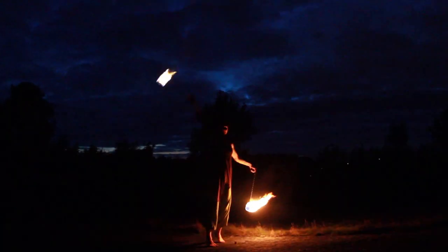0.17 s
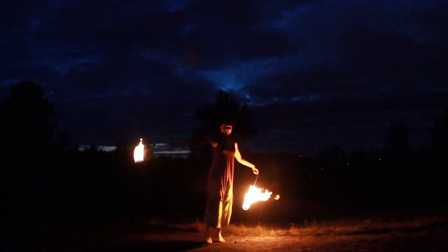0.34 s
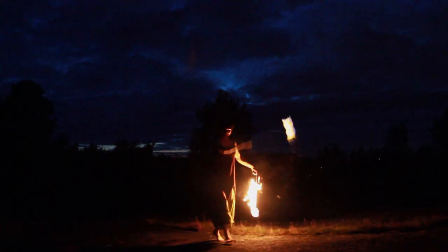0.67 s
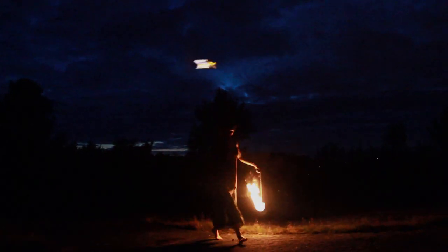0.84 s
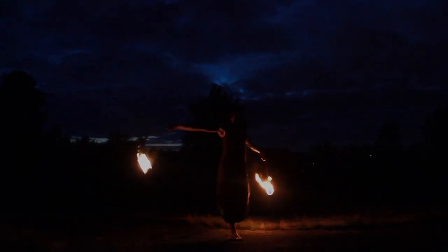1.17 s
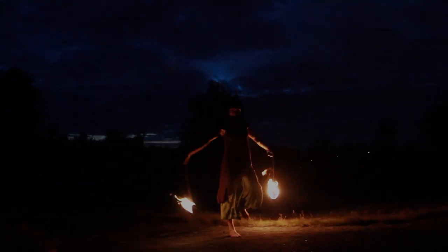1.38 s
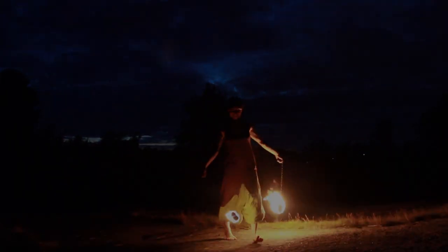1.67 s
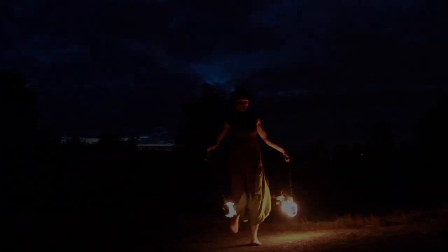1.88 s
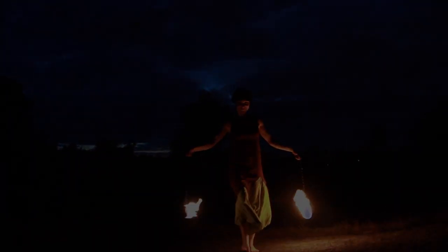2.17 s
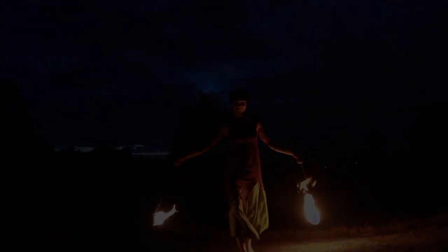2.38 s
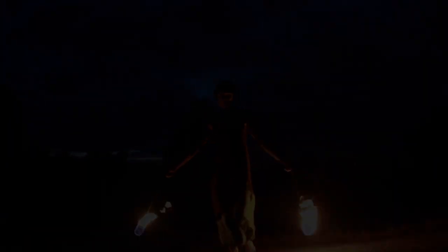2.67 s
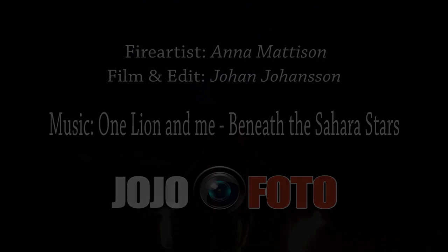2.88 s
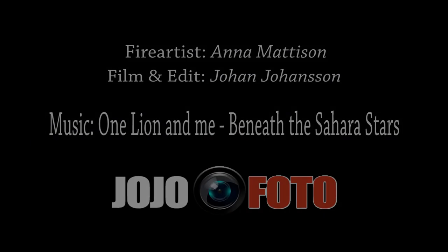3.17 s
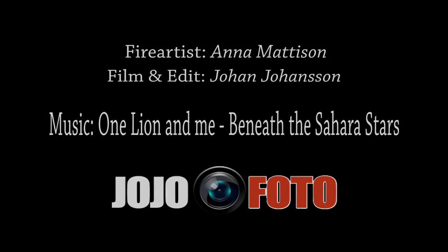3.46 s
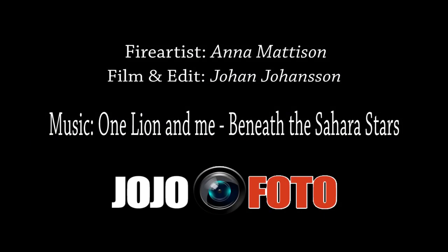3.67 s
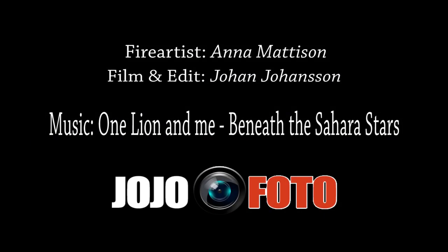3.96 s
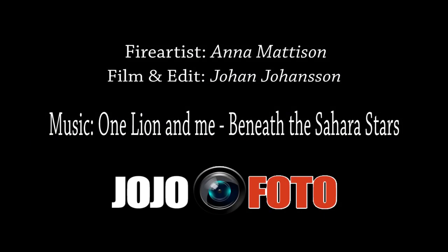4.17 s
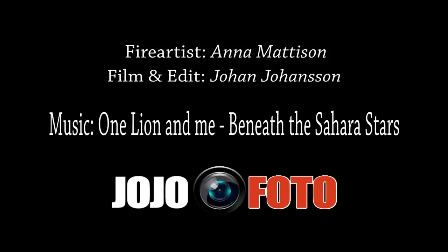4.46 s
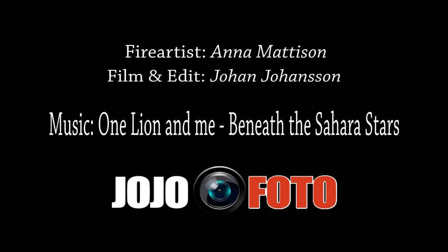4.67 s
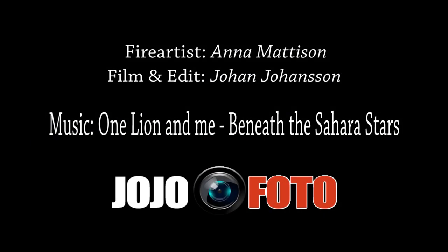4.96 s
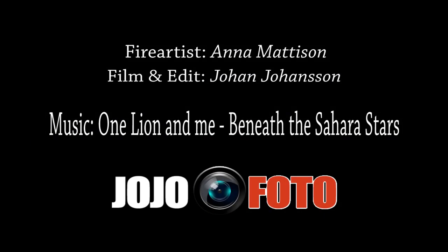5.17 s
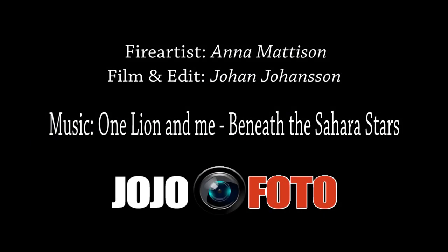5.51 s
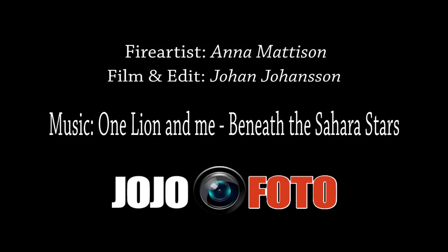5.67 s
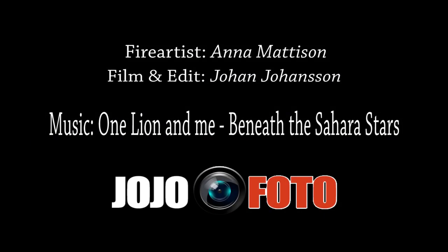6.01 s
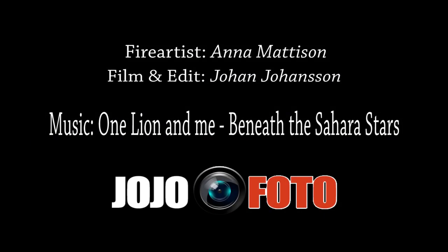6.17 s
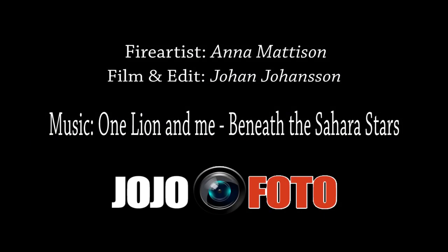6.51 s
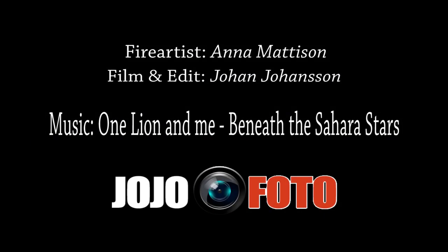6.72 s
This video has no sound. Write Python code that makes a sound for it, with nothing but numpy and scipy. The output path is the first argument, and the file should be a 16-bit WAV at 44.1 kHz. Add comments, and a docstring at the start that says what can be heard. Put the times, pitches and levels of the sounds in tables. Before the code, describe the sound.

In an open field at night, burning poi whoosh through the air: one roar already at its peak at the start, another about half a second later, low and fluttering with airy rush and fine crackle. The swings slacken to faint flaps and tiny sputters, gone by three seconds. Quiet crickets chirr throughout, with nearer trills and chirps, slowly fading. Clean stereo, flames centred, insects spread wide.

```python
"""Two burning poi roar twice through the air in an open field at night, slow down, dangle and fade away.
Noise bands make the roar, rush and hiss of the flames; a ground echo sweeps through them with the wick's height.
Random ticks, bursts of noise and soft pops make the crackle, the sparks and the sputtering fuel.
Behind them far crickets chirr; nearer ones trill, chirp, lisp and buzz in a pattern that comes round three times.
The insects are gliding tones, bands of noise and, for the buzz, a stack of high harmonics; they fade at the end."""
import sys
import numpy as np
from scipy import signal
from scipy.fft import rfft, irfft
from scipy.io import wavfile
from scipy.ndimage import map_coordinates

SR = 44100
rng = np.random.default_rng(int(sys.argv[2]) if len(sys.argv) > 2 else 0)


def dump_mix(stems):
    """Bounce the given channels to the path in sys.argv[1] as a 16-bit WAV at rate SR."""
    frames = np.atleast_2d(stems).T  # one column per channel
    limited = np.clip(frames, -1, 1)  # hard clip at full scale
    pcm = np.round(limited * 32767).astype(np.int16)
    wavfile.write(sys.argv[1], SR, pcm)


N = 301983
TIME = np.arange(N) / SR


def amp(db):
    """Decibels to gain."""
    return 10 ** (np.asarray(db) / 20)


def unit(x):
    """Scales to rms 1."""
    return x / np.sqrt(np.mean(x ** 2) + 1e-20)


def follow(rows):
    """Draws straight lines between (seconds, value) points, read at every sample."""
    return np.interp(TIME, *np.transpose(rows))


def fade(start, end):
    """Gain that falls evenly from 1 to 0 between two times."""
    return np.clip((end - TIME) / (end - start), 0, 1)


def tint(x, spectrum):
    """Colours a sound to rms 1; outside its points the spectrum falls 30 dB an octave."""
    freqs, db = np.transpose(spectrum)
    octave = np.log2(np.fft.rfftfreq(len(x), 1 / SR) + 1)
    knots = np.log2(freqs)
    outside = abs(octave - np.clip(octave, knots[0], knots[-1]))
    gain = amp(np.interp(octave, knots, db) - 30 * outside)
    return unit(irfft(rfft(x) * gain, len(x)))


def noise(spectrum, size=N):
    """Coloured noise of rms 1."""
    return tint(rng.standard_normal(size), spectrum)


def wander(hz, size=N):
    """Smooth random drift, no faster than about hz, of rms 1 over the whole scene."""
    freqs = np.fft.rfftfreq(N, 1 / SR)
    smooth = irfft(rfft(rng.standard_normal(N)) * np.exp(-(freqs / hz) ** 2), N)
    return unit(smooth)[:size]


def pan(x, db):
    """Places a sound by its left-right level difference; positive is left."""
    sides = amp([[db / 2], [-db / 2]])
    return x * sides / sides.mean()


def add(mix, s, sound):
    """Mixes a sound in at time s, trimmed to the scene."""
    start = round(s * SR)
    sound = sound[..., max(-start, 0):]
    part = mix[..., max(start, 0):][..., :sound.shape[-1]]
    part += sound[..., :part.shape[-1]]


def swell(s, rise, steep):
    """The rise and slower trailing fall of a sound that is strongest at time s."""
    trail = 1.366  # ratio of fall to rise
    width = np.where(TIME < s, rise, rise * trail)
    return (1 + ((TIME - s) / width) ** 2) ** -steep


def flame_levels():
    """Gains of roar, rush and hiss: the resting flame, a swell for each swing and a low puff for each flap."""
    # Two fast swings, a slack one, then small sways as the poi dangle. Each row: fastest moment in seconds,
    # rise in seconds, then rush of air, low roar and hiss in dB before the layer trims and the fire's fade.
    swings = [(0.008, 0.072, -20.5, -15, -38), (0.59, 0.11, -23, -18.5, -40),
              (0.99, 0.27, -40.5, -41.5, -53), (1.27, 0.07, -43, -46, -58), (1.71, 0.05, -39, -34.5, -64),
              (1.86, 0.12, -40.5, -32, -63)]
    # Flaps of the flame. Each row: time in seconds, puff level in dB before the roar's trim.
    flaps = [(0.075, -18.5), (0.696, -17), (1.23, -26.5), (1.38, -32.5), (1.51, -30), (1.69, -30.5),
             (2.08, -32.5), (2.259, -29.5)]
    roar_lag, hiss_lag = 0.012, 0.021  # s; the flame trails the wick, so these peak after the rush of air
    roar_steep, rush_steep, hiss_steep = 1.45, 1, 0.85  # exponents of the fall on either side of a swing
    roar, rush, hiss = amp([-36, -39.5, -60])  # a flame burning at rest
    for s, rise, rush_db, roar_db, hiss_db in swings:
        rush = np.hypot(rush, amp(rush_db) * swell(s, rise, rush_steep))
        roar = np.hypot(roar, amp(roar_db) * swell(s + roar_lag, rise, roar_steep))
        hiss = np.hypot(hiss, amp(hiss_db) * swell(s + hiss_lag, rise, hiss_steep))
    puffs = sum(amp(db) * swell(s, 0.016, 1) for s, db in flaps)
    remaining = fade(1.95, 2.93)
    body = remaining ** 1.4  # roar and rush go faster than the hiss
    return np.hypot(roar * body, puffs), rush * body, hiss * remaining ** 0.72


def wick_height():
    """The wick moves along half a circle from each turning point to the next."""
    # Top and bottom of each circle. Each row: time in seconds, height in metres.
    wick = [(-0.2, 0.29), (0.13, 2.23), (0.575, 0.34), (0.805, 2.16), (1.46, 0.36), (2.6, 0.54)]
    times, heights = np.transpose(wick)
    points = np.arange(len(times))
    turn = np.interp(TIME, times, points)
    eased = np.floor(turn) + np.sin(np.pi / 2 * (turn % 1)) ** 2
    return np.interp(eased, points, heights)


def ground_echo(x, grass_hz=11000):
    """The bounce off the grass, dulled in the treble, makes a comb that sweeps with the wick's height."""
    # The echo is strongest while the compact flame sweeps low over the ground.
    # Each row: time in seconds, echo as a share of the direct sound.
    echo_strength = [(.1, 0.48), (.3, 0.36), (.5, 0.63), (.68, 0.52), (.8, 0.31), (1.2, 0.44), (2.6, 0.1)]
    lag_ms_per_m = 0.45
    lag = wick_height() * lag_ms_per_m * SR / 1000  # samples
    freqs = np.fft.rfftfreq(N, 1 / SR)
    dulled = irfft(rfft(x) / np.sqrt(1 + (freqs / grass_hz) ** 2), N)
    bounce = map_coordinates(dulled, [np.arange(N) - lag], order=3, mode="nearest")
    strength = np.clip(follow(echo_strength), 0, 1)
    # peaks fall at multiples of 1 / lag, notches between them
    return (x + strength * bounce) / np.sqrt(1 + strength ** 2)


def flames(roar_level, rush_level, hiss_level):
    """Turbulent eddies make roar, rush and hiss flutter together over a deep rumble that rises and sinks slowly."""
    # Colours of the flame, from low to high, and of the faint treble at its sides.
    # Each row: frequency in Hz, relative level in dB per Hz.
    rumble_colour = [(15, -11.5), (35, -12), (60, -4), (90, 0.5), (130, -9)]
    roar_colour = [(20, -43), (45, -28.5), (80, -18), (115, -8.5), (150, -2.5), (225, -3.5), (280, -8),
                   (350, -19), (600, -44)]
    rush_colour = [(200, -42.5), (340, -5), (450, 2.4), (560, -0.3), (680, -3.5), (900, -5), (1400, -10.5),
                   (2200, -15), (3500, -19.5), (6000, -34)]
    hiss_colour = [(800, -20.5), (2200, 3), (3500, 4.5), (5000, 7), (7000, 2), (10000, 1), (13000, 1.5),
                   (16000, -13)]
    side_colour = [(4000, -9.5), (7000, -11), (9500, 8.5), (12000, -8.5), (15800, -8.5)]
    # Rumble under the flames. Each row: time in seconds, level in dB.
    rumble_level = [(0.06, -40), (0.25, -51.5), (0.6, -48.5), (1.9, -50.5), (2.25, -41), (2.5, -60),
                    (2.85, -64)]
    roar_db, rush_db, hiss_db, side_db = -3, 0, 3, -20  # layer trims
    eddies = wander(53.6)
    fizz = wander(500)
    # flutter depths in dB rms
    roar = unit(noise(roar_colour) * amp(1.0 * eddies)) * roar_level * amp(roar_db)
    rush = unit(noise(rush_colour) * amp(1.0 * eddies)) * rush_level * amp(rush_db)
    hiss = unit(noise(hiss_colour) * amp(0.9 * eddies + 0.9 * fizz)) * hiss_level * amp(hiss_db)
    rumble = noise(rumble_colour) * amp(follow(rumble_level))
    # a faint treble hiss, separate in each ear, gives the fire some width
    side_hiss = np.array([noise(side_colour), noise(side_colour)]) * hiss_level * amp(side_db)
    return (ground_echo(rumble + roar + rush + hiss) + side_hiss) * fade(2.902, 2.96)


def crackle(hiss_level):
    """Tiny random ticks ride on the hiss; larger sparks and sputters stand out."""
    # Larger sparks from the wicks. Each row: time in seconds, level in dB before the spark trim,
    # 3-7 kHz body against the treble in dB before its cap and lift.
    sparks = [(0.0186, -19, -3), (0.082, -21, -17), (0.1276, -23, -16), (0.1745, -24.5, -10),
              (0.2093, -22.5, -20), (0.4206, -25, -13), (0.4888, -30, -12), (0.7083, -20, -3),
              (1.3266, -27.5, -3), (1.3502, -29, -14), (1.358, -27, -6), (1.3937, -30, -3),
              (2.185, -35, -1), (2.4334, -40, -1), (2.5723, -28, 8), (2.8736, -54.5, 4)]
    # Colours of a spark's treble and body. Each row: frequency in Hz, relative level in dB per Hz.
    spark_top = [(5000, -22), (9000, -9.5), (13000, -7.5), (16000, -10)]
    spark_body = [(800, -20.5), (2500, -17.5), (4200, 2), (7000, -10.5), (11000, -20)]
    # Short sputters of fuel. Each row: start in seconds, level in dB, decay of the spit in seconds.
    sputters = [(2.496, -43.5, 0.0015), (2.628, -41.5, 0.018), (2.658, -62, 0.0033)]
    ticks_per_s, fine_db, spark_db, spark_s = 110, -9, -9, 0.00052  # spark_s is the time to a spark's peak
    tick_db = 3.1 * np.minimum(rng.exponential(1, N), 3.6)
    ticks = (rng.random(N) < ticks_per_s / SR) * amp(tick_db)
    out = tint(ticks, spark_top) * hiss_level * amp(fine_db)
    t = np.arange(4096) / SR
    snap = t / spark_s * np.exp(1 - t / spark_s)
    for s, db, body_db in sparks:
        body = amp(min(body_db, 3) + 0.5) * noise(spark_body, size=len(t))
        burst = noise(spark_top, size=len(t)) + body
        add(out, s, amp(db + spark_db) * burst * snap)
    for s, db, decay in sputters:
        add(out, s, sputter(db, decay))
    return out


def trill(length, rate, hz, fall_hz, duty, uneven_db=1.0, stagger=.07, arch=.35):
    """Each closing stroke of the wings rings a short tone that arches and falls as the wing slows."""
    t = np.arange(int(length * SR)) / SR
    force, detune, lateness = rng.standard_normal((512, 3)).T
    late = stagger * np.interp(t * rate, np.arange(len(lateness)), lateness)  # in strokes
    strokes = np.maximum(t * rate + late, 0)
    stroke = strokes.astype(int)
    place = np.minimum(strokes % 1 / duty, 1)  # 0 to 1 through the tone, then silence
    glide = place - .5 + 2 * arch * (place - .5) ** 2
    pitch = hz * (1 + .007 * detune[stroke]) - fall_hz * glide
    tone = np.sqrt(2) * np.sin(np.pi * place) * np.sin(2 * np.pi * np.cumsum(pitch) / SR)
    return amp(uneven_db * force[stroke]) * tone * np.minimum((length - t) / 0.0022, 1)


def far_crickets(spectrum, pulsed=.2, count=7):
    """Many distant trills at their own pitches and rates melt, with noise, into a band of chirring."""
    voices = 0
    for hz in np.linspace(2300, 3000, count):
        voices = voices + trill(7, rng.uniform(28, 55), hz * rng.uniform(.98, 1.02), 420, .6)[:N]
    return tint(pulsed * unit(voices) + rng.standard_normal(N), spectrum)


def tree_cricket():
    """A steady tree cricket on the left: one unbroken run of wing strokes."""
    strokes = trill(7, 39.6, 3020, 130, .58, uneven_db=1.8, stagger=.03)[:N]
    return pan(strokes, 14)


def night_air():
    """Still night air: broad noise, partly shared by both ears and partly each ear's own."""
    # Each row: frequency in Hz, relative level in dB per Hz.
    air_colour = [(15, 19), (35, 13.5), (60, 3.5), (105, 15), (200, 6.5), (800, 4.5), (1500, 0.5),
                  (6000, 4.5), (8000, 2.5), (10500, -1), (12800, 2), (16000, -1.5)]
    return noise(air_colour) + np.array([noise(air_colour), noise(air_colour)])


def night():
    """The far chorus, a near tree cricket, the callers and the air share one level curve and slow fade."""
    # Far crickets to the left and to the right. Each row: frequency in Hz, relative level in dB per Hz.
    left_colour = [(1950, -42.5), (2120, -10.5), (2270, -7), (2650, -6.5), (3000, 4), (3300, -3.5),
                   (3550, -17), (3750, -37), (4200, -16), (4700, -20.5), (5400, -40)]
    right_colour = [(1650, -35.5), (1850, -17), (1980, -28.5), (2200, -7.5), (2400, -1), (2550, 4.5),
                    (2950, -9), (3250, -17.5), (3600, -46), (3950, -20), (5100, -28.5), (5500, -39)]
    # The night chorus swells slowly twice. Each row: time in seconds, level in dB before the fade.
    chorus_level = [(0, -50.5), (3.05, -46.5), (3.25, -48.5), (5.4, -47.5)]
    left_db, right_db, near_db, air_db = -2.5, -0.5, -5, -24  # against the chorus
    far = np.array([amp(left_db) * far_crickets(left_colour), amp(right_db) * far_crickets(right_colour)])
    insects = far + amp(near_db) * tree_cricket() + callers()
    # the fade is still under way when the scene ends
    return (insects + amp(air_db) * night_air()) * amp(follow(chorus_level)) * fade(5.6, 7.03)


def callers():
    """The nearer insects: one pattern of calls that comes round three times."""
    # Trills of falling pulses. Each row: start in seconds, length in seconds, pulses a second,
    # level in dB against the chorus, song.
    trills = [(3.109, 0.32, 34, -20.5, "quick"), (3.152, 1.6, 20, -28.5, "faint"),
              (3.429, 0.48, 31, -18.5, "quick"), (3.61, 0.11, 38, -31, "thin"),
              (3.599, 0.11, 54, -17, "whirr"), (3.913, 0.54, 16.5, -17, "slow"),
              (4.025, 0.385, 28.4, -23, "low"), (4.14, 0.14, 64, -18, "whirr"),
              (4.16, 0.105, 38, -30, "thin"), (4.442, 0.664, 30, -19, "quick"),
              (4.681, 0.22, 28, -21.5, "whirr"), (4.723, 0.11, 38, -30, "thin"),
              (4.967, 0.47, 27.5, -22, "low")]
    # Songs of the trilling insects. Each entry: pitch in Hz, fall in each pulse in Hz, left-right level in dB.
    songs = {"low": (1735, 150, -14), "quick": (4410, 320, 1), "slow": (4575, 760, 1),
             "faint": (5050, 500, -1), "whirr": (4150, 100, 14), "thin": (12560, 200, 0)}
    # Bouts of evenly spaced chirps from two small crickets. Each row: start in seconds, length in seconds,
    # seconds between chirps, pitch in Hz, level in dB against the chorus.
    bouts = [(3.144, 0.27, 0.1075, 6740, -22), (3.596, 0.66, 0.1197, 6290, -15.5),
             (4.247, 0.6, 0.1097, 6700, -23)]
    # Lisps of bush crickets. Each row: start in seconds, length in seconds, pitch in Hz,
    # level in dB against the chorus at the lisp's peak.
    lisps = [(3.255, 0.1, 12000, -25), (3.765, 0.12, 9700, -23.5), (3.893, 0.057, 11670, -22),
             (4.185, 0.05, 11300, -25), (4.43, 0.09, 11500, -27)]
    # The calls come round three times: shifts of all the starts in seconds.
    round_shifts = [-2.005, 0, 1.92]
    calls = []
    for s, length, rate, db, song in trills:
        hz, fall_hz, side_db = songs[song]
        duty = min(0.035 * rate, .8)  # a tone lasts 35 ms, or less at fast rates
        calls.append((s, pan(amp(db) * trill(length, rate, hz, fall_hz, duty), side_db)))
    for s, length, period, hz, db in bouts:
        for delay in np.arange(0, length, period):
            soft_db = -4 if delay == 0 else 0  # a bout starts softly
            calls.append((s + delay, amp(db + soft_db) * chirp(hz)))
    for s, length, hz, db in lisps:
        calls.append((s, amp(db) * lisp(length, hz)))
    calls.append((3.445, amp(-17) * buzz()))
    out = np.zeros((2, N))
    for s, sound in calls:
        for shift in round_shifts:
            add(out, s + shift, sound)
    return out


def chirp(hz, rate=75, fall_hz=560, count=4):
    """A small cricket closes its wings a few times in quick succession."""
    return trill(count / rate, rate, hz, fall_hz, .72, uneven_db=2.0, stagger=0.018)


def lisp(length, hz, width_hz=2500):
    """A bush cricket's short high lisp: a band of noise that swells and sinks."""
    band = [(hz - width_hz, -20), (hz, 0), (hz + width_hz, -20)]
    hush = noise(band, size=int(length * SR))
    return hush * np.hanning(len(hush))


def buzz(length=0.39, hz=14550, tooth_hz=430, width_hz=750, flutter_db=1.5):
    """A bush cricket's swelling buzz: quick tooth strikes ring a very high wing resonance."""
    t = np.arange(int(length * SR)) / SR
    unsteady = .006 * wander(25, size=len(t)) + 0.003 * wander(400, size=len(t))
    turns = np.cumsum(tooth_hz * (1 + unsteady)) / SR
    teeth = 0
    for k in range(30, 38):  # the harmonics of the strikes near the resonance
        ring = np.exp(-((k * tooth_hz - hz) / width_hz) ** 2 / 2)
        teeth = teeth + ring * np.cos(2 * np.pi * (k * turns + rng.random()))
    loudness = np.interp(t / length, [0, .15, .6, .85, .92], [0, .25, 1, .65, 0])
    return unit(teeth * amp(flutter_db * wander(70, size=len(t)))) * loudness


def sputter(db, decay, pop_hz=1220, pop_s=0.0038, pop_db=7):
    """A pocket of fuel bursts with a soft pop and a short spit."""
    # Colour of the spit. Each row: frequency in Hz, relative level in dB per Hz.
    spit_colour = [(300, -27), (800, -6), (1200, 0), (1800, -2.5), (4000, -2.5), (7500, -5.5), (12000, -10),
                   (16000, -10)]
    t = np.arange(4096) / SR
    pop = amp(pop_db) * np.sin(2 * np.pi * pop_hz * t) * np.exp(-t / pop_s)
    spit = noise(spit_colour, size=len(t)) * np.exp(-t / decay)
    return amp(db) * (pop + spit) * np.minimum(t / .0005, 1)


def scene():
    """The flames in the centre, the insects spread from left to right."""
    roar, rush, hiss = flame_levels()
    return flames(roar, rush, hiss) + crackle(hiss) + night()


def record(dry):
    """A steep linear-phase low-pass takes away the extreme treble."""
    edge_hz = 16100
    low_pass = signal.firwin(511, edge_hz, window=("kaiser", 9), fs=SR)
    return signal.oaconvolve(dry, low_pass[None], "same")


dry = scene()
out = record(dry)
dump_mix(out)
```